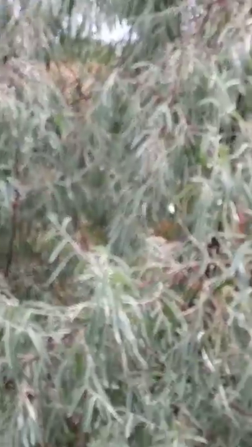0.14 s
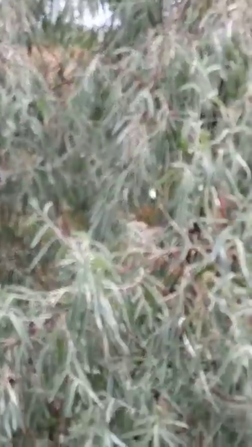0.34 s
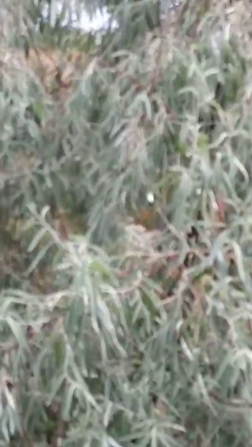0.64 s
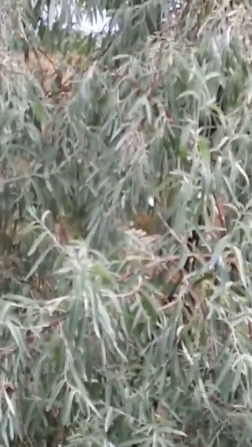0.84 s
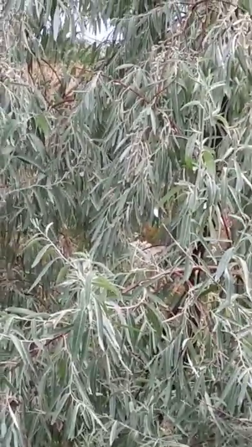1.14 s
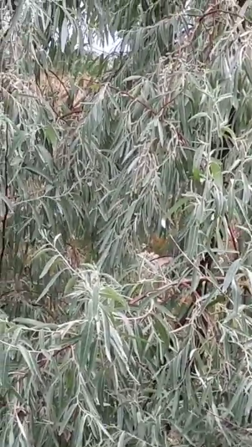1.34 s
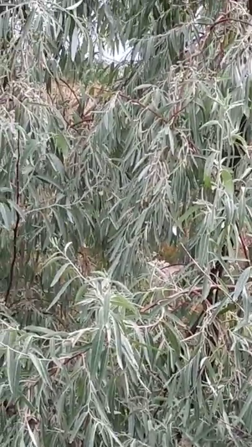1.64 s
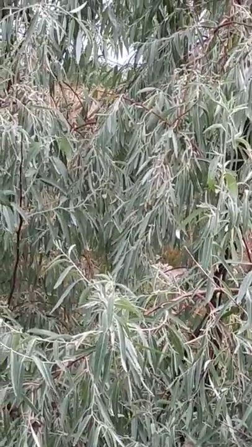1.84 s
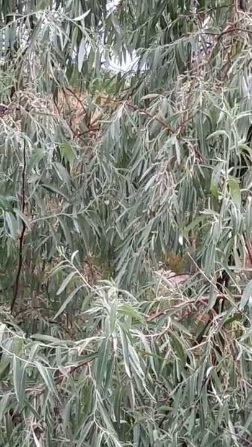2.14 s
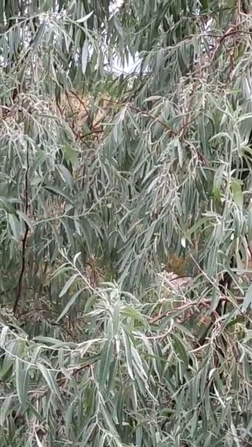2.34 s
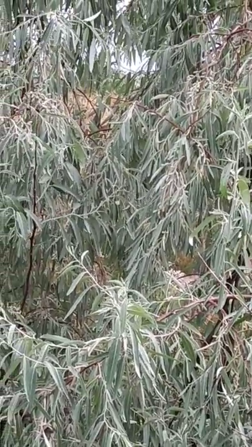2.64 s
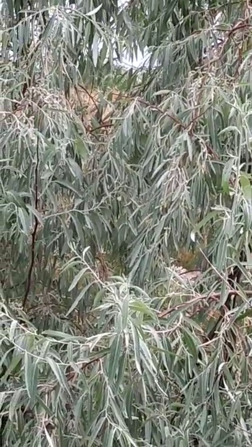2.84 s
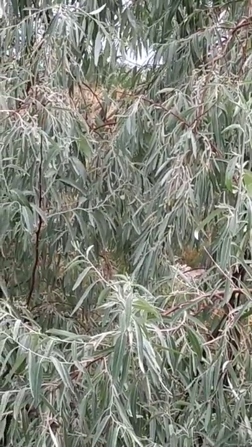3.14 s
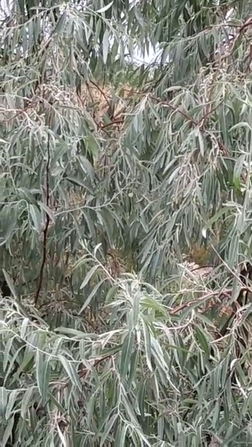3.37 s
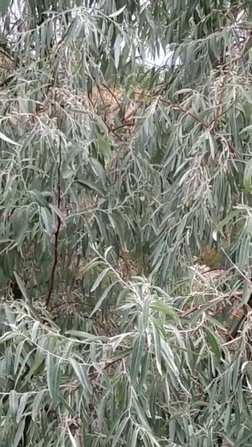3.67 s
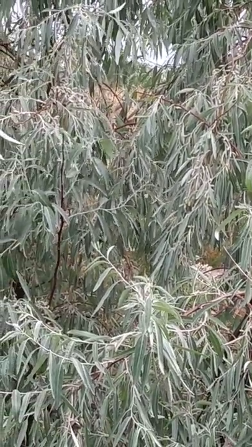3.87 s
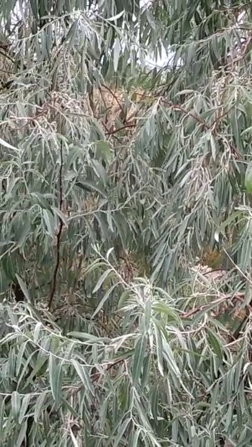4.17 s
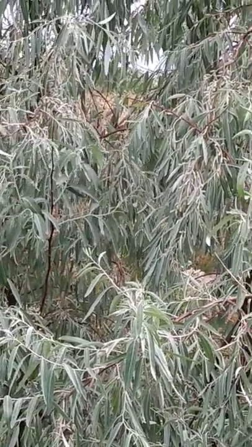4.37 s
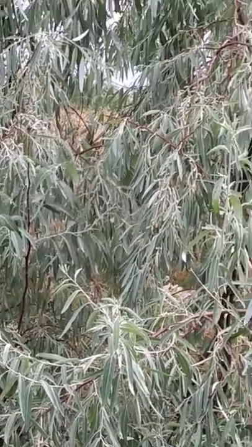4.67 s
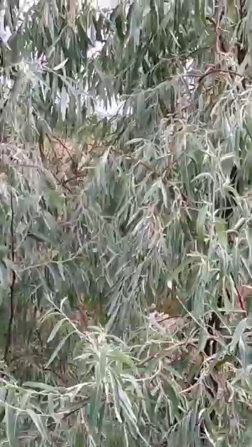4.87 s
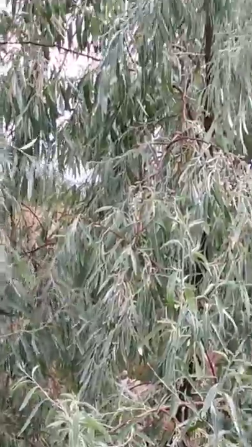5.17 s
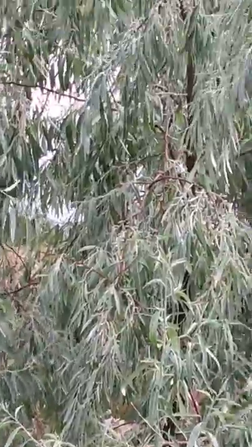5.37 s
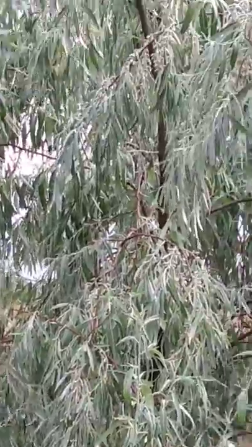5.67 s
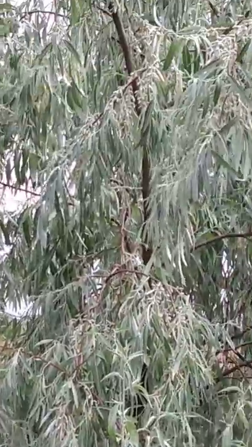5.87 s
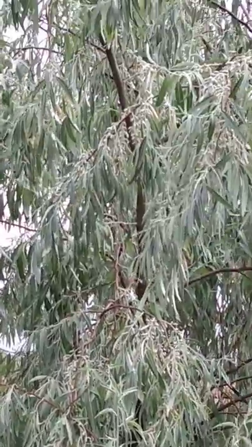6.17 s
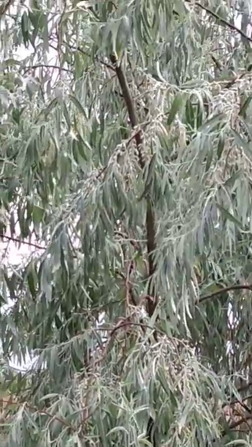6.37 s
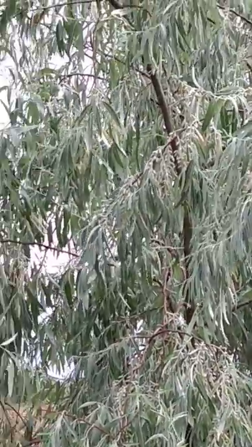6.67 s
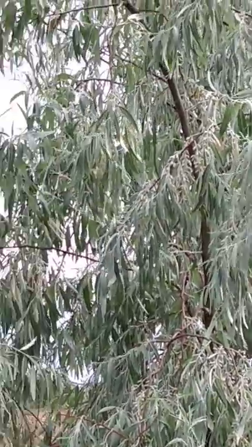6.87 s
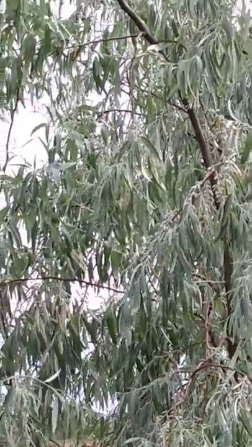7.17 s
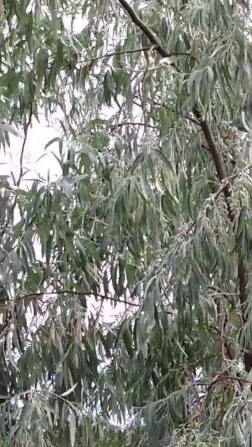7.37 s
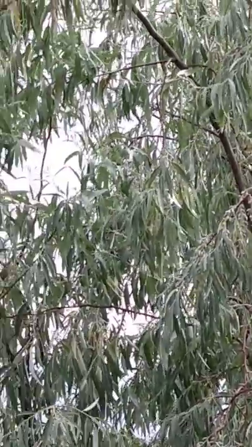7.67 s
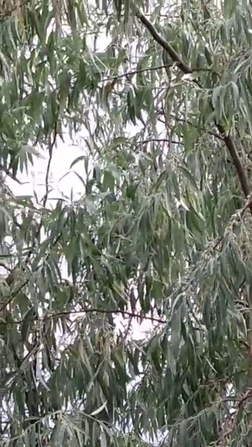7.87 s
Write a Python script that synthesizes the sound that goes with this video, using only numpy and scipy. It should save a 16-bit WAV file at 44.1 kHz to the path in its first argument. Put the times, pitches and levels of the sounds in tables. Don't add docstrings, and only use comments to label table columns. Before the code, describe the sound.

Outdoors in a soft leafy breeze, twigs click and small birds peep faintly before a nearby quail bursts into loud, buzzy falling calls.

```python
import sys
import numpy as np
from scipy import signal
from scipy.fft import rfft, irfft, next_fast_len
from scipy.io import wavfile
from scipy.ndimage import uniform_filter1d

SR = 44100
rng = np.random.default_rng(int(sys.argv[2]) if len(sys.argv) > 2 else 0)


def ratio(d):
    e = np.asarray(d, float) / 20
    return 10 ** e


def to_wav(s):
    ch = np.atleast_2d(s).T
    pcm = np.round(np.clip(ch, -1, 1) * 32767)
    wavfile.write(sys.argv[1], SR, pcm.astype(np.int16))


N = 353682


def noise(size):
    return rng.standard_normal(size)


def curve(table, hz):
    f, db = np.transpose(table)
    return ratio(np.interp(np.log(np.maximum(hz, 1)), np.log(f), db))


def colour(x, table):
    n = next_fast_len(len(x))
    f = np.arange(n // 2 + 1) * SR / n
    return irfft(rfft(x, n) * curve(table, f), n)[:len(x)]


def bell(x, hz, octaves):
    n = next_fast_len(len(x))
    f = np.arange(n // 2 + 1) * SR / n + 1
    band = np.exp(-.5 * (np.log2(f / hz) / octaves) ** 2)
    y = irfft(rfft(x, n) * band, n)[:len(x)]
    return y / np.sqrt(np.mean(y ** 2))


def walk(size, rate):
    k = max(int(SR / rate), 1)
    steps = np.repeat(noise(size // k + 1), k)
    return 1.31 * uniform_filter1d(uniform_filter1d(steps, k), k)[:size]


def flicker(size, rate, db):
    w = walk(size, rate)
    return ratio(db * (w - w.mean()))


def add(out, s, x):
    i = max(int(s * SR), 0)
    out[i:i + len(x)] += x[:max(len(out) - i, 0)]


def turns(hz):
    return 2 * np.pi * np.cumsum(hz) / SR


def whistle(hz):
    return np.sin(turns(hz))


def arch(length, first_hz, top_hz, last_hz, at=.55, edge=.16):
    u = np.arange(int(length * SR)) / (length * SR)
    climb = (first_hz - top_hz) * (1 - u / at) ** 2
    sink = (last_hz - top_hz) * ((u - at) / (1 - at)) ** 2
    swell = np.sin(np.pi / 2 * np.clip(np.minimum(u, 1 - u) / edge, 0, 1))
    return top_hz + np.where(u < at, climb, sink), swell


def played(call, size):
    s, hz, db = np.transpose(call)
    t = np.arange(s.min() - .004, s.max() + 0.008, 1 / SR)
    fade = np.clip(np.minimum(t - t[0], t[-1] - t) / 0.0038, 0, 1)
    pitch = uniform_filter1d(np.interp(t, s, hz), size)
    return t[0], pitch, ratio(uniform_filter1d(np.interp(t, s, db), size)) * fade


def stack(hz, throat, tilt, shimmer=0., slack=0., beak=0.99, count=16):
    phase = turns(hz)
    out = 0
    for k in range(1, count + 1):
        high = np.clip((k * hz - 3200) / 1000, 0, 1)
        gain = curve(throat, k * hz / beak ** (1 - high)) * (k * hz < SR / 2)
        gain = gain * float(k) ** -tilt * ratio(-slack * high)
        gain = gain * flicker(len(hz), 120, shimmer * (4 if k < 4 else 22))
        wander = shimmer * k * (.7 + .15 * high) * walk(len(hz), 340)
        out = out + gain * np.sin(k * phase + wander)
    return out, phase


# t/s, centre f/Hz, level/dB
BREEZE = [(0, 4200, -101), (.8, 4930, -83.5), (1.3, 6360, -81), (2, 6300, -79.5), (3, 5900, -80),
          (4, 5700, -80), (4.6, 5930, -74), (5.2, 7650, -71.5), (6, 7750, -79), (6.6, 7900, -79),
          (7.099, 7230, -73.5), (7.599, 6920, -76), (8.02, 6780, -78.5)]
# f/Hz, level/dB
AIR = [(15, -62), (28, -46), (45, 0), (70, -3), (200, -8), (400, -10), (800, -13), (2000, -17), (4500, -19),
       (8000, -26), (10500, -31.5), (13000, -31), (16000, -27.5), (17000, -64)]
AIR_DB = -66


def breeze():
    t = np.arange(N) / SR
    s, hz, db = np.transpose(BREEZE)
    centre, hiss = np.interp(t, s, hz), 0
    for band in 3200 * 2 ** (np.arange(16) / 9):
        off = np.log2(band / centre)
        share = np.exp(-.5 * (off / np.where(off > 0, .09, .22)) ** 2)
        hiss = hiss + share * ratio(2.0 * walk(N, 7.0)) * bell(noise(N), band, 0.1)
    air = colour(noise(N), AIR)
    gusts = ratio(-75.0 + 1.3 * walk(N, 4.7)) * bell(noise(N), 56, 0.91)
    return hiss * ratio(np.interp(t, s, db) - 2.0) + air * ratio(AIR_DB - 1.5) / np.std(air) + gusts


# peak t/s, swell t/s, level/dB, centre f/Hz, thump level/dB
SWISHES = [(.15, 0.024, -69.5, 5500, -83), (1.339, 0.02, -57.5, 6000, -62), (1.316, 0.0056, -77, 600, -55),
           (1.5, 0.033, -64.5, 6300, -71), (2.707, 0.023, -68.5, 5000, -106), (2.89, 0.031, -69, 6000, -87),
           (3.149, 0.041, -74, 4500, -61), (4.592, 0.04, -70, 5500, -70), (4.674, 0.039, -51.5, 2740, -55),
           (4.683, 0.025, -64, 600, -81), (4.809, .009, -39.5, 6000, -59), (5.698, 0.014, -62.5, 6500, -65),
           (5.835, 0.011, -58.5, 6500, -61.5), (6.474, 0.0092, -53, 7500, -68),
           (7.772, 0.0021, -53.5, 4000, -94.5)]
# peak t/s, rise t/s, level/dB, centre f/Hz, thump level/dB
SNAPS = [(0.456, 0.002, -70, 3500, -52.5), (1.364, 0.0045, -57, 5000, -58), (1.406, 0.0034, -55, 5960, -70),
         (2.302, 0.0062, -75, 3000, -57.5), (4.971, 0.0028, -44, 2900, -54),
         (5.114, 0.0019, -52.5, 5460, -79), (5.154, 0.0059, -56, 5630, -64),
         (5.395, 0.0031, -61.5, 1460, -64), (5.412, 0.0026, -63, 1380, -55),
         (6.464, 0.0018, -50, 3000, -42), (6.485, 0.0018, -55.5, 6500, -46)]
SNAP_FALL_S = 0.014
# f/Hz, level/dB
LEAF_TOP = [(100, -6), (600, 7), (4200, -1.5), (6000, 4), (7600, -1.5), (9500, -17), (16000, -22.5)]


def leaves(out):
    events = [(row, row[1]) for row in SWISHES] + [(row, SNAP_FALL_S) for row in SNAPS]
    for (s, rise, db, hz, thump_db), fall in events:
        t = np.arange(-4 * rise, 5 * fall, 1 / SR)
        shape = np.exp(np.where(t < 0, t / rise, -t / fall))
        grains = noise(len(t)) * ratio(2.2 * walk(len(t), 1200))
        crackle = colour(bell(grains, hz, 2.2 if hz < 4900 else 1.7), LEAF_TOP)
        thump = shape * bell(noise(len(t)), 143, 1.0)
        add(out, s + t[0], shape * (ratio(db) * crackle + ratio(thump_db) * thump))


# t/s, length t/s, f/Hz, level/dB
RASPS = [
    (5.574, 0.094, 7860, -72),
    (7.002, 0.11, 7570, -53),
    (7.129, 0.041, 4650, -57),
    (7.16, 0.069, 6260, -66),
    (7.813, 0.1, 7800, -71.5),
    (7.91, 0.1, 5900, -67.5),
]


def rasps(out):
    for s, length, hz, db in RASPS:
        swell = np.hanning(int(length * SR))
        add(out, s, ratio(db) * swell * bell(noise(len(swell)), hz, 0.041))


CRINKLE_S, CRINKLE_FALL_S, CRINKLE_HZ, CRINKLE_DB = 4.81, .007, 14000, -50


def crinkle(out):
    t = np.arange(-4 * CRINKLE_FALL_S, 5 * CRINKLE_FALL_S, 1 / SR)
    shape = np.exp(-np.abs(t) / CRINKLE_FALL_S)
    add(out, CRINKLE_S + t[0], ratio(CRINKLE_DB) * shape * bell(noise(len(t)), CRINKLE_HZ, 0.27))


# t/s, peak level/dB, centre f/Hz
TICKS = [(.456, -53, 4200), (.4575, -52, 1000), (4.968, -34, 3980), (4.9725, -33.5, 2520),
         (4.978, -44, 4200), (1.332, -54, 5900), (1.3603, -36.5, 2700), (1.3616, -31, 6200),
         (1.377, -57, 6500), (1.4024, -42, 3500), (1.4052, -56, 6300), (1.413, -50, 6000),
         (1.4305, -49, 6000), (3.219, -48, 580), (3.585, -55, 5000), (3.683, -51, 5600), (3.709, -49, 5430),
         (4.609, -41, 5750), (4.639, -47, 5200), (4.769, -50, 5300), (4.8018, -42, 5300),
         (4.8075, -29.5, 2580), (4.81, -40.5, 940), (4.816, -41, 900), (4.8075, -20.5, 6020),
         (4.8075, -37, 13000), (4.812, -21, 5700), (4.95, -43, 2800), (4.9543, -39, 6500),
         (5.022, -51, 5500), (5.101, -53, 5500), (5.153, -46, 2000), (5.1555, -34.5, 6550),
         (5.172, -45, 6000), (5.32, -64, 7500), (5.36, -50, 6500), (5.392, -44, 1500), (5.507, -48, 5430),
         (5.684, -63, 7000)]


def twigs(out):
    t = np.arange(SR // 100) / SR
    for s, db, hz in TICKS:
        tick = colour(bell(noise(len(t)), hz, 0.63), LEAF_TOP) * np.exp(-t / (0.00064 + 2 / hz))
        add(out, s, ratio(db - 5.5) * tick / np.abs(tick).max())


# t/s, length t/s, foot f/Hz, top
# f/Hz, level/dB
ARCHES = [(.478, .041, 1950, 3560, -64), (2.138, .019, 5550, 6360, -60.5), (2.139, .02, 3000, 3220, -66),
          (2.263, .035, 1950, 3480, -63), (3.451, .012, 1300, 1780, -63), (3.45, .011, 2650, 3230, -69),
          (3.776, .014, 1750, 2280, -70), (5.595, .044, 1920, 4030, -64), (5.818, .012, 1620, 1960, -55)]
FOOT_SAG_HZ = 444
# t/s, length t/s, first f/Hz, last f/Hz, level/dB
GLIDES = [(.645, .012, 3000, 3450, -74), (.652, .038, 3430, 3530, -68), (.69, .03, 3520, 3500, -76),
          (1.27, .033, 500, 340, -62), (1.89, .025, 5890, 5940, -76), (1.927, .15, 3300, 3290, -74),
          (2.142, .018, 4150, 4170, -73), (2.327, .27, 3780, 3600, -78.5), (2.555, .1, 4520, 4640, -82),
          (2.874, .036, 3210, 3680, -70), (2.922, .025, 3620, 3500, -75), (3.624, .06, 5760, 5620, -80),
          (5.497, .05, 5410, 5360, -80), (6.38, .026, 800, 1150, -64), (6.495, .04, 8400, 8050, -75),
          (6.686, .039, 9100, 8000, -71), (6.75, .011, 7000, 8150, -61.5), (6.86, .038, 9120, 8040, -70),
          (7.815, .012, 8180, 7980, -71.5)]
GLIDE_REST = 0.46
# t/s, length t/s, first f/Hz, last f/Hz, level/dB
HUM = [
    (4.615, .12, 130, 112, -56),
]


def pure_notes(out):
    notes = []
    for s, length, foot, top, db in ARCHES:
        notes.append((s, db, arch(length, foot, top, foot - FOOT_SAG_HZ, at=0.79, edge=0.071)))
    for s, length, first, last, db in GLIDES:
        notes.append((s, db, arch(length, first, first + GLIDE_REST * (last - first), last)))
    for s, length, first, last, db in HUM:
        notes.append((s, db, arch(length, first, first, last, edge=0.53)))
    for s, db, (hz, swell) in notes:
        add(out, s, np.sqrt(2) * whistle(hz) * swell * ratio(db) * flicker(len(hz), 150, 1.5))


# t/s, length t/s, first f/Hz, top f/Hz, level/dB
TWO_VOICED = [
    (3.999, .039, 1490, 3510, -63),
    (5.921, 0.033, 1720, 3430, -63),
    (6.745, .03, 1887, 3760, -54),
]


def two_voiced_peeps(out):
    for s, length, first, top, db in TWO_VOICED:
        hz, swell = arch(length, first, top, .52 * top, at=.64)
        rise = np.clip((hz - 2200) / 600, 0, 1)
        extra = ratio(2.5) * whistle(2 * hz) + ratio(3.0) * whistle(0.46 * hz + 3050)
        add(out, s, (whistle(hz) + rise * extra) * swell * ratio(db))


# t/s, f/Hz, level/dB
ANSWER = [(7.128, 4370, -78), (7.136, 5130, -47), (7.144, 5715, -29.5), (7.16, 5560, -27),
          (7.166, 5050, -33), (7.169, 4750, -52), (7.171, 3900, -72)]
# t/s, f/Hz, level/dB
THIN_WHISTLE = [(7.868, 1500, -59), (7.874, 3650, -54), (7.878, 5300, -60), (7.884, 4400, -68),
                (7.892, 3060, -47), (7.899, 1890, -63)]


def clear_whistles(out):
    for call in (ANSWER, THIN_WHISTLE):
        s, hz, gain = played(call, size=130)
        add(out, s, gain * whistle(hz))


# t/s, length t/s, top f/Hz, level/dB
FAR = [(.87, 0.14, 977, -84), (1.756, 0.23, 995, -78), (2.337, 0.071, 985, -75), (2.589, 0.11, 1006, -75.5),
       (2.827, 0.12, 1005, -76), (3.372, 0.048, 970, -71.5), (3.622, 0.13, 987, -75.5),
       (3.86, .1, 990, -75), (4.456, 0.032, 976, -71.5), (5.634, 0.024, 964, -74), (5.861, 0.14, 965, -77),
       (6.139, 0.059, 970, -76)]
# f/Hz, level/dB
DISTANT = [(900, 1), (1750, 4), (2000, 3)]
# t/s, length t/s, top f/Hz, level/dB
CHIPS = [
    (3.58, .019, 1270, -66.5),
    (6.405, .017, 1500, -60),
]
# f/Hz, level/dB
CHIP_THROAT = [(1000, 10), (1600, -16), (2300, 14), (3000, 2.5), (4400, 0), (5300, 7), (6300, 3.5),
               (7400, -3), (8500, -22)]
FAR_FIRST, FAR_LAST, CHIP_FIRST, CHIP_LAST = .87, .89, .6, .66


def far_calls(out):
    far = (FAR, DISTANT, FAR_FIRST, FAR_LAST, .11, 2)
    chips = (CHIPS, CHIP_THROAT, CHIP_FIRST, CHIP_LAST, .45, 7)
    for calls, throat, first, last, edge, count in (far, chips):
        for s, length, top, db in calls:
            hz, swell = arch(length, first * top, top, last * top, at=0.62, edge=edge)
            tone, _ = stack(hz, throat, 0.055, shimmer=0.021, count=count)
            add(out, s, tone * swell * ratio(db) * flicker(len(hz), 60, 2.5))


# t/s, f/Hz, level/dB
FIRST = [(1.885, 600, -83), (1.907, 688, -61.5), (1.929, 844, -49.5), (1.945, 934, -51.5),
         (1.975, 965, -46.5), (2.04, 946, -50.5), (2.093, 856, -52.5), (2.155, 684, -60), (2.182, 519, -77)]
# f/Hz, level/dB
FAR_THROAT = [(500, -8), (950, -2), (1590, -11), (1690, -1), (1885, 9), (1945, -2.5), (2100, 5), (2390, -5),
              (2540, 3.5), (2730, -11.5), (2890, -3.5), (3300, -19),
              (3700, -32), (4900, -39), (5900, -27), (6200, -7.5), (6800, -18), (7600, -29), (8500, -10)]


def far_quail(out):
    s, hz, gain = played(FIRST, size=500)
    slack = 150 * np.clip(1 - hz / 870, 0, 1)
    tone, _ = stack(hz, FAR_THROAT, 0.12, shimmer=0.03, slack=slack, count=8)
    add(out, s, gain * tone * flicker(len(hz), 30, .8))
    add(out, s, gain * ratio(-32) * bell(noise(len(hz)), 11000, 0.68))


# top t/s, effort level/dB, pitch factor, drop-out level/dB
CLUCKS = [
    (3.45, -56.5, .96, -16),
    (5.815, -52, 1.04, -20),
    (7.305, -60, .86, -1),
]
# t/s from the top, f/Hz, effort level/dB, drop-out share 0-1
CLUCK = [(-.053, 502, -8.5, 0), (-.028, 571, -0.5, 0), (-.005, 744, 2, 0.1), (0, 824, 2.5, 0.8),
         (0.013, 805, 5, 1), (.017, 688, 3.5, 0), (.029, 442, -11, 0)]
# t/s, f/Hz, level/dB
THIN_WIND_UP = [(7.81, 420, -67.5), (7.85, 514, -68), (7.866, 697, -48), (7.870, 813, -85)]
PIT_BEAK = 1


def soft_notes():
    for s, db, factor, out_db in CLUCKS:
        points = [(s + d, f * factor, db + e + share * out_db) for d, f, e, share in CLUCK]
        yield *played(points, size=70), PIT_BEAK
    yield *played(THIN_WIND_UP, size=70), PIT_BEAK


# crack t/s, effort level/dB, wind-up pitch factor, whistle end t/s, its last f/Hz
PITS = [
    (3.855, -39, 0.89, 0.014, 2390),
    (6.222, -35.5, 1, 0.0205, 2285),
    (6.581, -33.5, 1.05, .021, 2640),
]
# t/s from the crack, f/Hz, effort level/dB
WIND_UP = [(-.072, 350, -32), (-.05, 379.4, -24), (-.031, 421, -32), (-.02, 505.4, -12.5),
           (-.012, 575, -2.5), (-.002, 782, -1), (0, 1463, 0)]
LEAP_S, LEAP_HZ = .0067, 2860
DROP_S, DROP_HZ, DROP_DB = .008, 1150, -24


def pit_notes():
    for s, db, factor, end, end_hz in PITS:
        whistled = [(LEAP_S / 2, 2200, -4), (LEAP_S, LEAP_HZ, .5), (end, end_hz, -3),
                    (end + 0.0024, 0.95 * end_hz, -17), (end + DROP_S, DROP_HZ, DROP_DB)]
        points = [(s + d, f * factor, db + e) for d, f, e in WIND_UP]
        points += [(s + d, f, db + e) for d, f, e in whistled]
        yield *played(points, size=70), PIT_BEAK


# crack t/s, wind-up stretch, fall stretch, half width of the leap t/s, effort level/dB
CALLS_LOUD = [
    (6.9885, 0.83, 1.05, 0.0046, -23.5),
    (7.4665, 1.054, 0.96, 0.0043, -23.5),
    (8.0105, .98, 1.4, .005, -22.5),
]
# t/s from the crack, f/Hz, effort level/dB, beak opening as a factor on the throat resonances
CALL = [(-.047, 445, -30, .95), (-.032, 563.2, -14, 0.87), (-.011, 816, -2.5, 1.01), (0.013, 962, -4, 1.07),
        (0.032, 972.6, 3, 1.01), (0.054, 956, 1.5, .98), (0.078, 770, -6.5, .93), (0.102, 631.5, -9.5, .88),
        (0.117, 520, -19, 0.87)]
# t/s from the crack, f/Hz, effort level/dB
LEAD_IN = [(-0.056, 340, -58.5)]
# t/s from the crack, f/Hz, effort level/dB
TRAIL = [(.129, 458, -30), (.165, 312, -48)]
CRACK_HZ, FALL_S = 1500, 0.079
CRACK_STEEP, CRACK_DB, CRACK_LAG_S = 3.1, 8.5, 0.0024
SETTLE_HZ, SETTLE_S = 119, .009


def loud_calls():
    for s, stretch, fall, width, db in CALLS_LOUD:
        points = []
        for d, f, e, *_ in LEAD_IN + CALL + TRAIL:
            moved = d * stretch if d < 0 else d + (fall - 1) * 3 * max(d - FALL_S, 0)
            points.append((s + moved, f, db + e))
        start, hz, gain = played(points, size=70)
        after = start + np.arange(len(hz)) / SR - s
        opening = np.interp(after, np.transpose(CALL)[0], np.transpose(CALL)[3])
        leap = 1 / (1 + np.abs(after / width) ** CRACK_STEEP)
        push = 1 / (1 + np.abs((after - CRACK_LAG_S) / width) ** CRACK_STEEP)
        settle = SETTLE_HZ * np.clip(after / width, 0, 1) * np.exp(-np.maximum(after, 0) / SETTLE_S)
        yield start, hz + settle + CRACK_HZ * leap, gain * ratio(CRACK_DB * push ** 0.45), opening


# f/Hz, level/dB
WHISTLE_PATH = [(2000, -5), (2700, 4.5), (3700, -3), (4700, 1.5), (5600, 0), (6500, -2), (7600, 1),
                (8500, -12)]


def cracked_voice(hz, phase, gain):
    beak = flicker(len(hz), 1100, 2.6)
    apart = 1720 + 60 * walk(len(hz), 500)
    drift = turns(apart)
    main = beak * curve(WHISTLE_PATH, 2 * hz) * np.sin(2 * phase)
    second = ratio(-9) * curve(WHISTLE_PATH, 2 * hz + apart) * np.sin(2 * phase + drift)
    third = ratio(-26.5) * np.sin(2 * phase + 2 * drift)
    low = ratio(-19.5) * (gain / ratio(-19.5)) ** 0.44 * np.clip((hz - 1200) / 900, 0, 1) * np.sin(phase)
    return main + second + third + low + ratio(-29.5) * np.sin(4 * phase)


# f/Hz, level/dB
NEAR_THROAT = [(400, 1), (720, -9.5), (980, -9), (1350, -19.5), (1600, -6), (2400, 9), (2750, 1.5),
               (2910, -16), (3150, -0.5), (3700, -26.5), (5000, -8.5), (5800, -29.5), (7000, -24.5),
               (9000, -85.5)]
BLUR, SLACK_DB = .07, 25


def near_quail(out):
    for s, hz, gain, opening in [*loud_calls(), *pit_notes(), *soft_notes()]:
        size = len(hz)
        crack = np.clip((hz - 1110) / 130, 0, 1)
        soft = np.clip(1 - gain / ratio(-36.0), 0, 1)
        hz = hz * (1 + (.003 + .01 * crack) * walk(size, 900))
        slack = SLACK_DB * np.clip(1 - hz / 980, 0, 1)
        tone, phase = stack(hz, NEAR_THROAT, 0.3 + 1.6 * soft, shimmer=BLUR, slack=slack, beak=opening)
        voice = (1 - crack) * tone + crack * cracked_voice(hz, phase, gain)
        harsh = colour(bell(noise(size), 5000, .6), LEAF_TOP) * (gain / ratio(-24)) ** .9
        rasp = uniform_filter1d(crack, size=300)
        breath = colour(noise(size), NEAR_THROAT)
        hiss = bell(noise(size), 6000, 0.28) * (1 - soft)
        air = bell(noise(size), 12000, 0.35) * (gain / ratio(-32.5)) ** .6
        air = air * (.12 + signal.lfilter([.004], [1, -.996], crack ** 2))
        rough = ratio(-11.0) * rasp * harsh + ratio(-36) * air + ratio(-29.0) * breath + ratio(-29) * hiss
        add(out, s, gain * (voice + rough))


# f/Hz, level/dB
SHRUB = [(300, -44), (1500, 5.5), (2200, -5.5), (3700, 4.5), (5500, -1.5), (7300, 9), (9000, 8.5),
         (14000, -23)]


def shrub_echo(out):
    t = np.arange(SR // 2) / SR
    tail = ratio(-23.0) * ratio(-60 * t / 0.054) + ratio(-45.5) * ratio(-60 * t / 0.28)
    echo = colour(noise(len(t)), SHRUB) * tail * np.clip(t / .004, 0, 1) * ratio(-10)
    return signal.fftconvolve(out, echo)[:N]


def scene():
    out = np.zeros(N)
    for source in (leaves, rasps, crinkle, twigs, pure_notes, two_voiced_peeps, clear_whistles,
                   far_calls, far_quail, near_quail):
        source(out)
    return (out + shrub_echo(out) + breeze())[None]


def roll_off(x):
    return signal.sosfilt(signal.butter(12, 16230, fs=SR, output="sos"), x)


# f/Hz, level/dB
MIC = [(20, -20), (36, -6), (50, 0), (15800, 0), (16300, -50)]


def record(dry):
    rounded = np.tanh(1.5 * dry[0]) / 1.5
    return roll_off(colour(rounded, MIC)[None])


dry = scene()
out = record(dry)
to_wav(out)
```